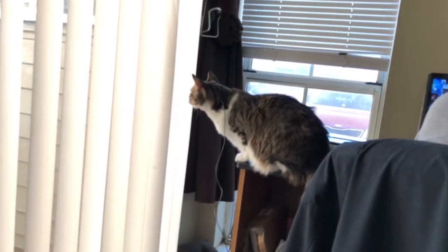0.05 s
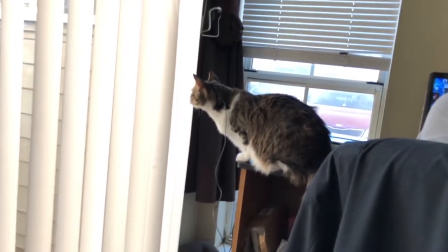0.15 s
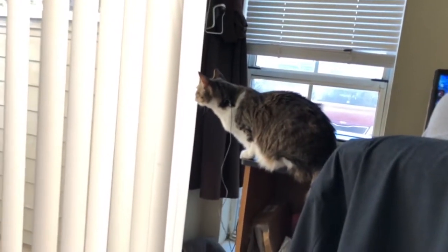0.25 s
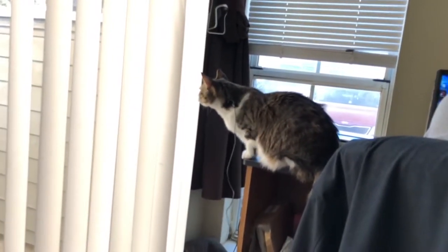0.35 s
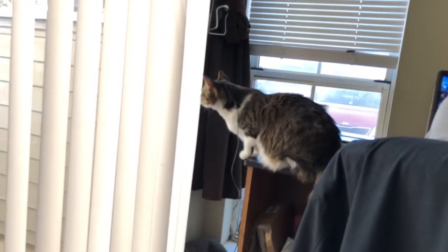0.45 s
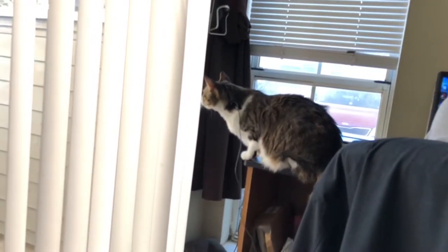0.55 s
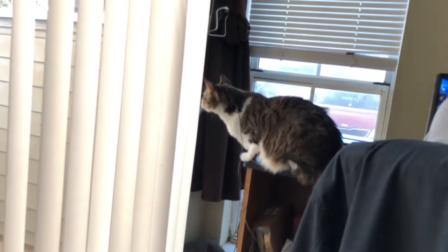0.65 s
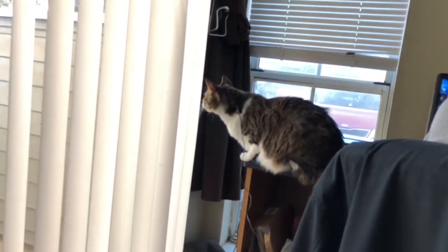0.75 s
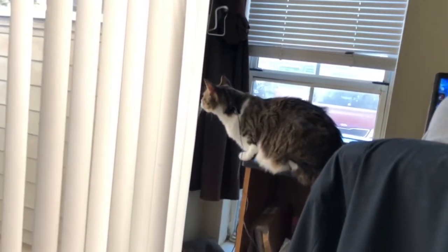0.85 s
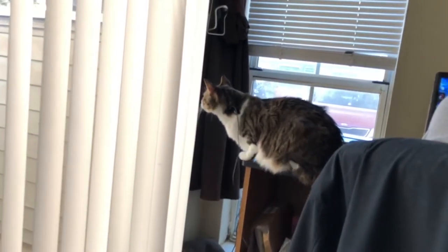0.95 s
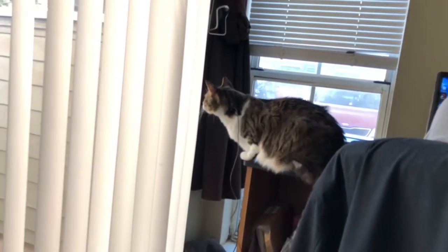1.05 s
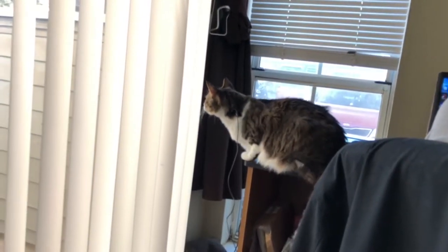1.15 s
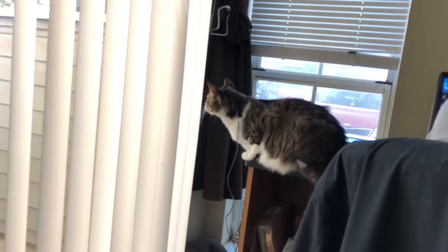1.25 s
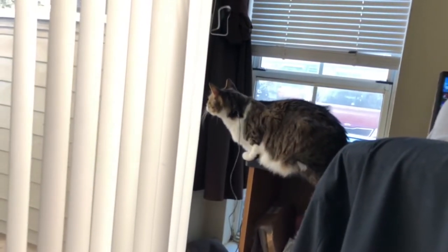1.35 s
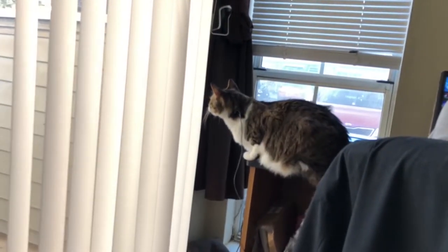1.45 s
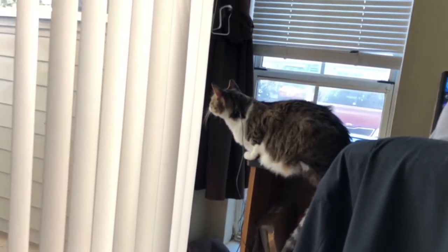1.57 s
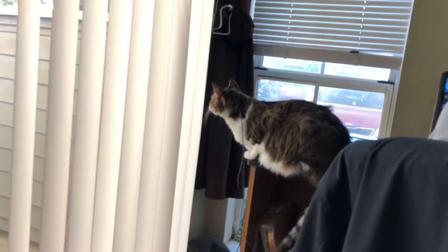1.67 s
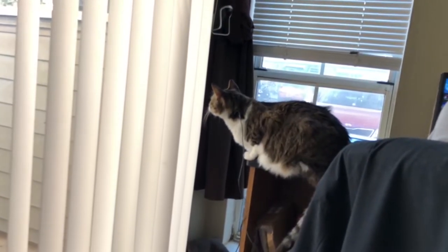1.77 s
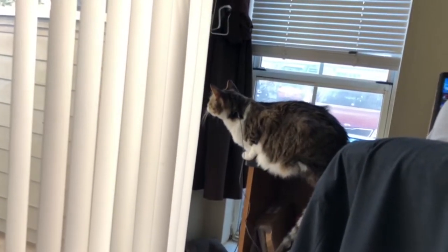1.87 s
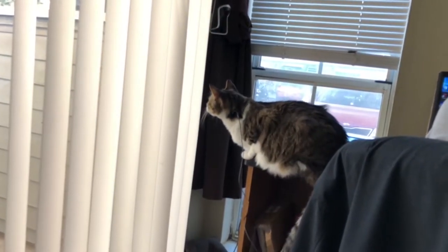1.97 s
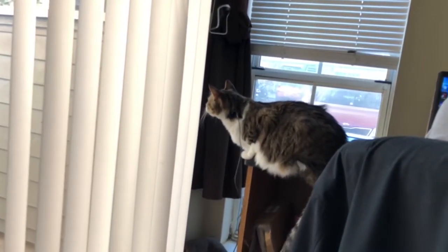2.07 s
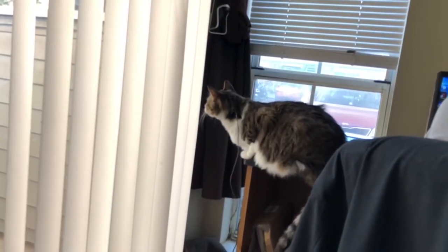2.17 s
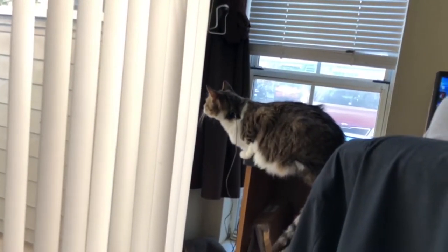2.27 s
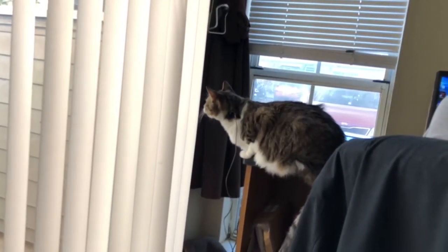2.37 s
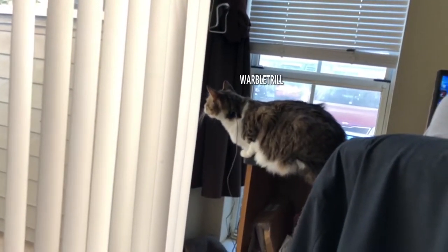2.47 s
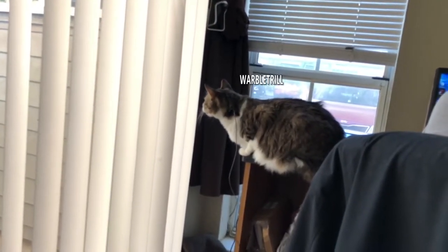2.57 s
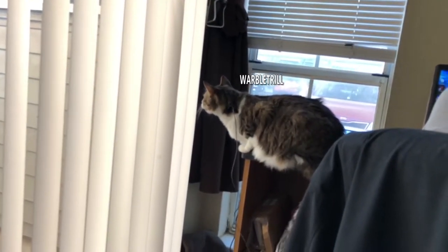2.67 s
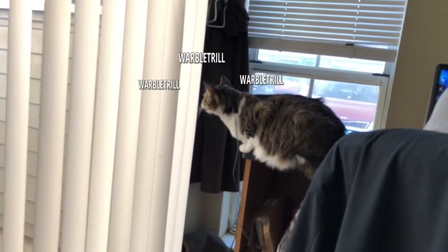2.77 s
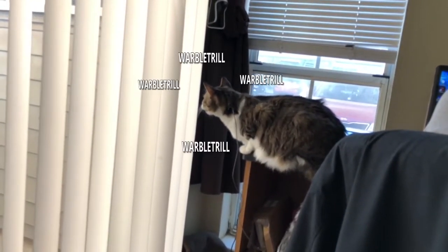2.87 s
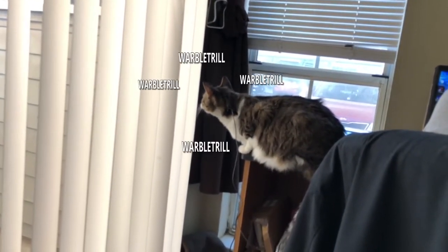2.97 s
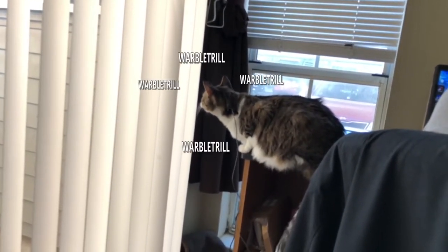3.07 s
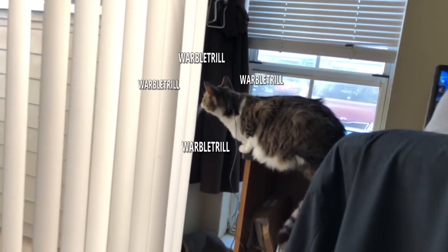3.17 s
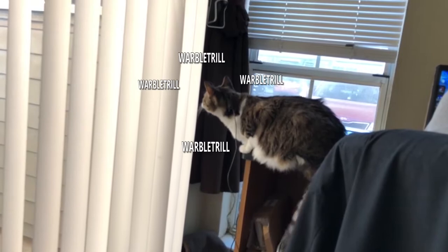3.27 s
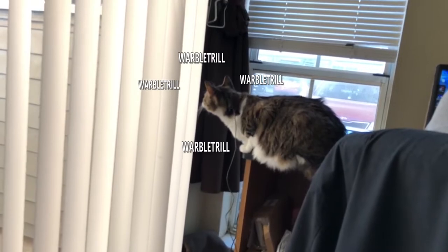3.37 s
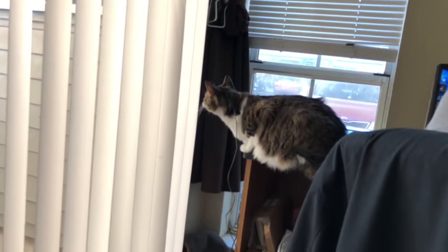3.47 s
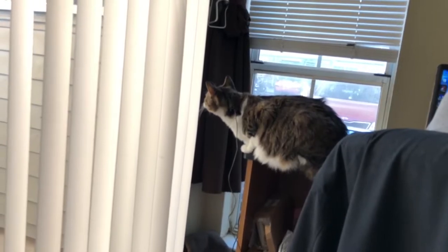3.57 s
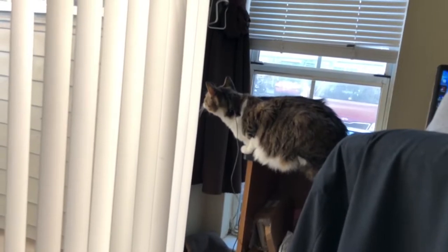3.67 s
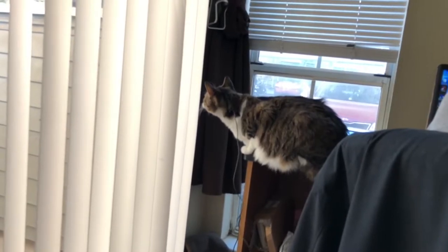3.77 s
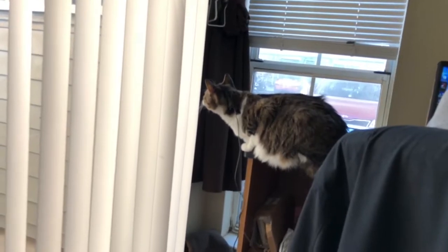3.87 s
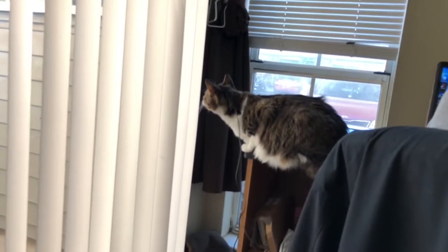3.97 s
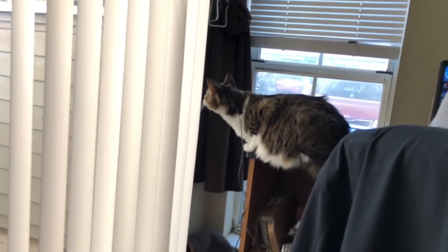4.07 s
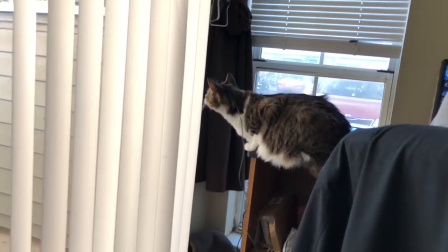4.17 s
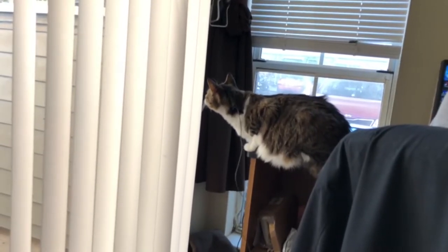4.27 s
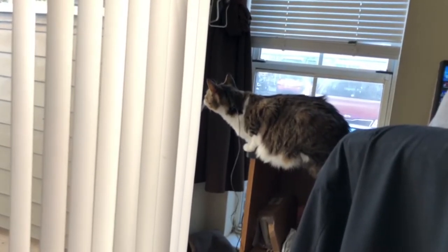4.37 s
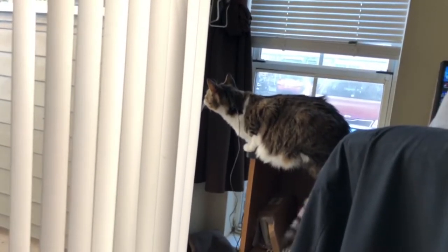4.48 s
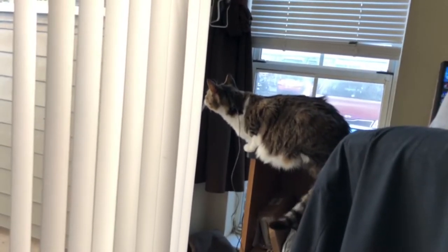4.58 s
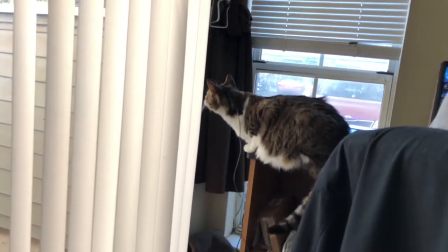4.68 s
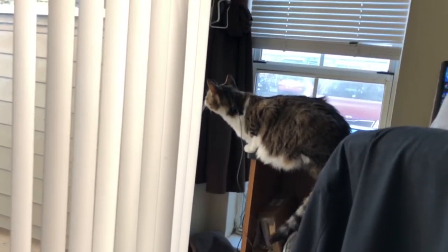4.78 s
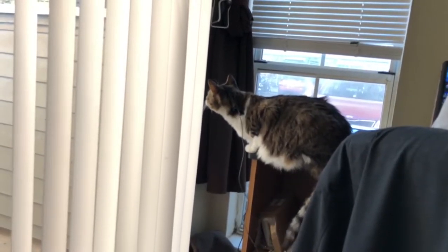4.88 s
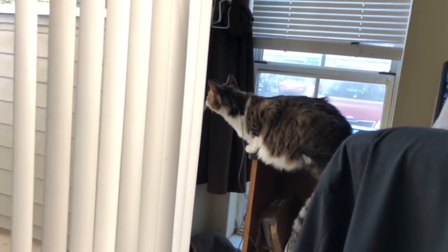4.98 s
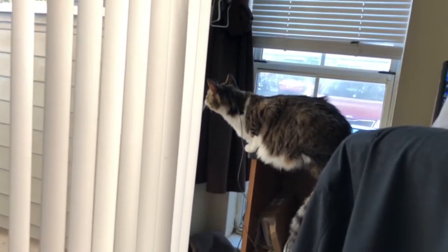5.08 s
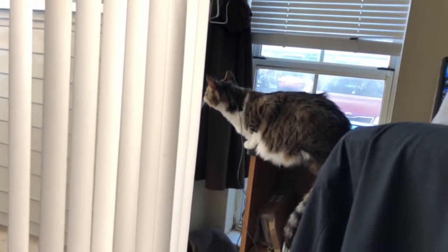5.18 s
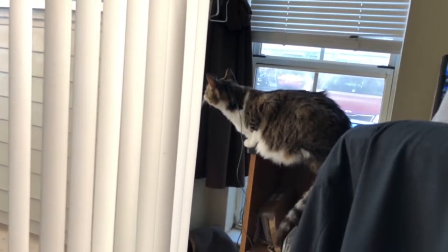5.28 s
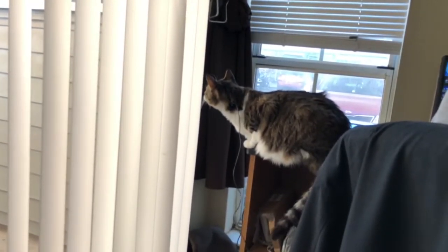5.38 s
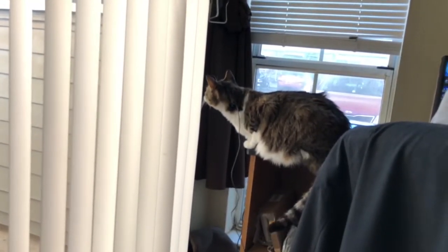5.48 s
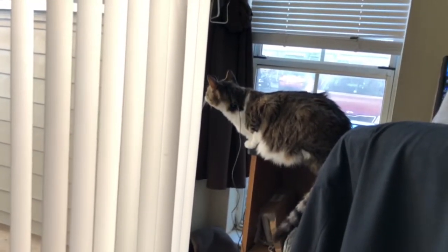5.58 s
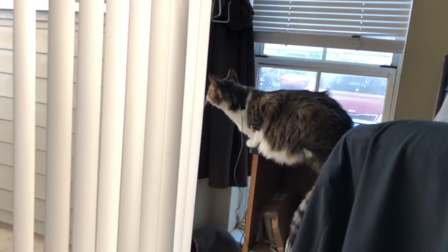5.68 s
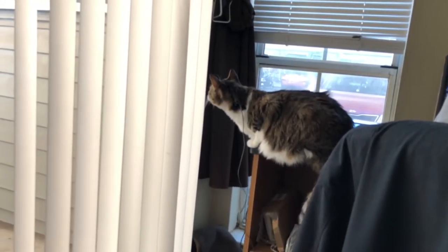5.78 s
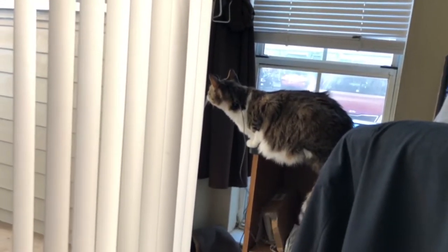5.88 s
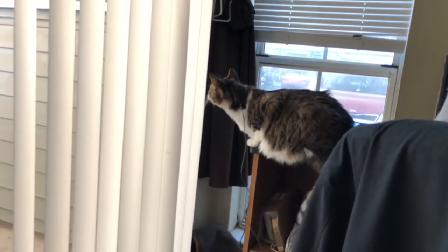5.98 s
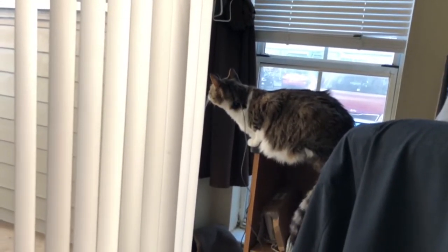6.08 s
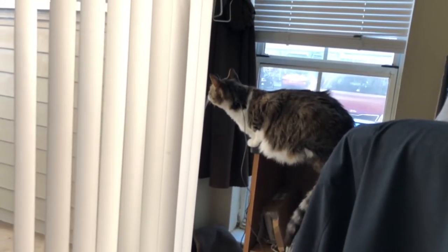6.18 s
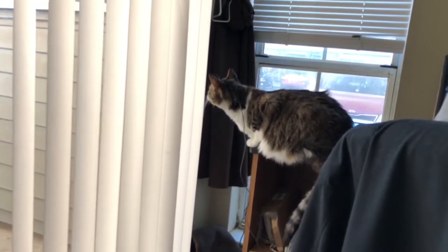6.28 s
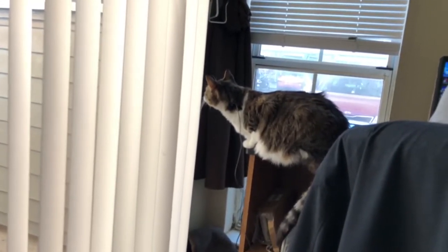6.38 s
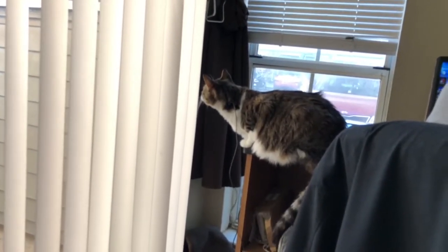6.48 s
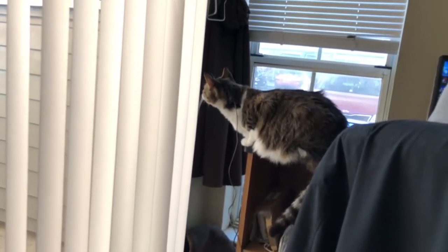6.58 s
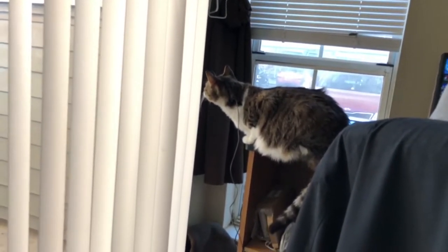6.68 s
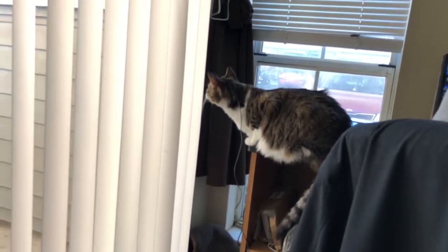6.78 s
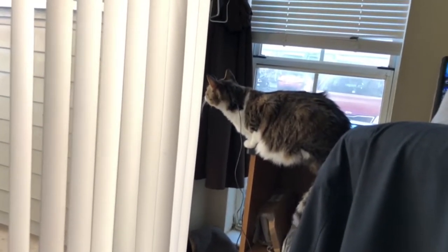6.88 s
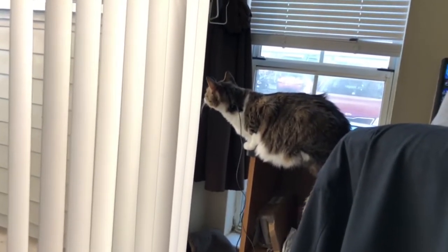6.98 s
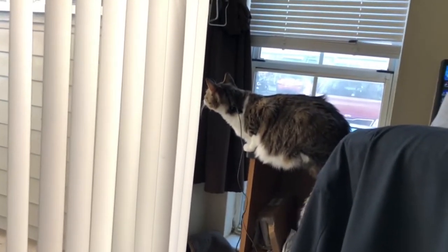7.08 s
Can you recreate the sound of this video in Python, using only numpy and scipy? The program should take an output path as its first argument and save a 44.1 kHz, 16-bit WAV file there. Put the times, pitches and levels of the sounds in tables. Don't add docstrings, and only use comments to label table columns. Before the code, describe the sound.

In a quiet, softly furnished room, a low fan hum, deep house rumble and soft duct air run steadily. Sparse dry ticks snap nearby. After about two and a half seconds a cat gives one short warbling chirp, rough at its start and edged with wet mouth clicks. A sharper tick follows, then later a little soft rustle and a faint metal tag tinkle. Heard through a phone microphone with softened top treble.

```python
import sys
import numpy as np
from scipy import signal
from scipy.fft import rfft, irfft, next_fast_len
from scipy.io import wavfile
from scipy.ndimage import uniform_filter1d

SR = 44100
rng = np.random.default_rng(int(sys.argv[2]) if len(sys.argv) > 2 else 0)


def volts(x):
    e = np.asarray(x, float) / 20
    return 10 ** e


def generate_wav(sig):
    pcm = np.round(np.clip(np.atleast_2d(sig).T, -1, 1) * 32767).astype(np.int16)
    wavfile.write(sys.argv[1], SR, pcm)


N = 314874


def evened(x):
    return x / np.sqrt(np.mean(x ** 2) + 1e-20)


def read(points, hz):
    f, value = np.transpose(points)
    return np.interp(np.log(hz + 0.12), np.log(f + 0.083), value)


def follow(table, t):
    s, *columns = np.transpose(table)
    return [uniform_filter1d(np.interp(t, s, c), size=300) for c in columns]


def add(mix, s, sound):
    part = mix[round(s * SR):][:len(sound)]
    part += sound[:len(part)]


def drift(rate_hz, size):
    padded = next_fast_len(size, True)
    hz = np.fft.rfftfreq(padded, 1 / SR)
    spectrum = rfft(rng.standard_normal(padded)) * np.exp(-(hz / rate_hz) ** 2) * (hz > 0)
    return evened(irfft(spectrum, padded)[:size])


def ring(x, hz, width):
    r = np.exp(-np.pi * width / SR)
    return signal.lfilter([1, 0, -1], [1, -2 * r * np.cos(2 * np.pi * hz / SR), r * r], x)


# multiple of shaft rate, level/dB rms, waver/dB
SHAFT = [(1, -30, 2.5), (2, -52.5, -4.5), (3, -62.5, 8), (5, -57.5, 2.5), (6, -60.5, 2.5), (10, -69.5, 2)]
# multiple of mains rate, level/dB rms, waver/dB
MAGNETIC = [(1, -43.5, 0.84), (2, -47.5, 2.35)]
SHAFT_HZ, MAINS_HZ = 29.63, 60.28


def motor():
    shaft = np.cumsum(SHAFT_HZ + 0.073 * drift(2.9, N)) / SR
    mains = MAINS_HZ * np.arange(N) / SR
    out = np.zeros(N)
    for turns, orders in ((shaft, SHAFT), (mains, MAGNETIC)):
        for k, db, waver_db in orders:
            level = volts(db + waver_db * drift(2.55, N))
            out += level * np.sqrt(2) * np.sin(2 * np.pi * (k * turns + rng.random()))
    return out


# f/Hz, level/dB per Hz
RUMBLE = [(1, -37), (4, -39.5), (10, -46), (18, -46), (25, -56.5), (40, -67.5), (60, -54.5), (80, -68.5),
          (115, -65), (135, -74), (175, -74.5), (210, -82), (300, -105)]


def rumble():
    hz = np.fft.rfftfreq(N, 1 / SR)
    shape = volts(read(RUMBLE, hz)) * np.sqrt(SR / 2) * (hz < 400)
    return irfft(rfft(rng.standard_normal(N)) * shape, N)


# f/Hz, level/dB per Hz
AIR = [(120, -28), (200, 0), (300, -8.5), (390, -11), (800, -11.5), (980, -12), (1200, -12), (1600, -18.5),
       (2750, -23.5), (3500, -29.5), (4400, -32), (10300, -38.5), (11800, -43), (16000, -42.5)]
# f/Hz, width/Hz, level/dB rms
DUCT = [(256, 9.6, -68.5), (604.4, 9, -68), (801, 27, -67.5), (1156, 40, -70.5), (2702, 24, -79.5)]
AIR_DB = -55.5
GUST_DB, SETTLE_S = 1, 2.2


def air():
    frames, hz = N // 256 + 5, np.fft.rfftfreq(1024, 1 / SR)
    a, b, patches = rng.standard_normal((frames, 513, 3)).T
    patches = uniform_filter1d(patches, size=14, axis=0)
    patches = evened(uniform_filter1d(patches, size=12, axis=1))
    at = np.arange(frames) * 256
    swell = drift(3.6, N)[np.minimum(at, N - 1)]
    gust_db = np.outer(np.clip(hz / 2000, 0, 1), GUST_DB * np.exp(-(at / SR / SETTLE_S) ** 2))
    z = (a + 1j * b) * volts(read(AIR, hz)[:, None] + patches + 0.18 * swell + gust_db)
    out = volts(AIR_DB) * evened(signal.istft(z, nperseg=1024, noverlap=768)[1][:N])
    for f, width, db in DUCT:
        out += volts(db) * evened(ring(rng.standard_normal(N), f, width))
    return out


# t/s, peak level/dB, low part level/dB
TICKS = [(0.156, -52, -8), (0.5495, -57, -6), (0.6039, -58, -6), (0.8045, -56, -4), (1.1175, -55, -6),
         (1.21, -52, -2), (1.2139, -56, -4), (1.2238, -50, 4), (1.8286, -52, -6), (3.2594, -55, -6),
         (3.277, -37, 4), (3.689, -56, -6), (3.7657, -55, -6), (4.0089, -48, 6), (5.428, -53, -6),
         (6.5639, -54, -2)]
# t/s, peak level/dB
THIN_TICKS = [
    (1.928, -49),
    (2.1759, -58),
    (2.802, -64),
    (2.9271, -52.5),
    (2.9815, -55),
    (3.109, -53),
]
TICK_HZ, THIN_HZ, THIN_LOW_DB = 10000, 12300, -14.5


def ticks():
    out, click = np.zeros(N), np.zeros(400)
    click[0] = 1
    events = [(*row, TICK_HZ) for row in TICKS]
    events += [(*row, THIN_LOW_DB, THIN_HZ) for row in THIN_TICKS]
    for s, db, low_db, hz in events:
        high = ring(ring(click, hz, 2800), 0.96 * hz, 7000)
        low = ring(click, 0.74 * hz, 1500) + ring(click, 0.42 * hz, 1500)
        snap = high / abs(high).max() + volts(low_db) * low / abs(low).max()
        add(out, s + 0.0017, volts(db) * snap)
    return out


def room(x):
    at = np.arange(150, 9000, 22)
    at = at + rng.integers(0, 22, len(at))
    taps = np.zeros(9100)
    taps[at] = rng.choice([-1., 1.], len(at)) * volts(-60 * at / SR / 0.28)
    return signal.oaconvolve(x, taps / np.linalg.norm(taps))[:N]


# t/s, peak level/dB, centre f/Hz, width/Hz, tail/s
SMACKS = [(2.4017, -61, 7200, 2500, .003), (2.405, -59, 7500, 9000, .3), (2.416, -43, 2300, 2200, 0.004),
          (2.433, -58, 8500, 4000, .03), (2.4618, -45, 5200, 1520, .004), (2.8, -62, 7970, 8960, 0.33),
          (2.459, -32.5, 4640, 2980, 0.0033), (2.4595, -55, 11000, 9000, .006),
          (2.4640, -48, 5560, 900, 0.026), (2.4640, -50, 7600, 1200, 0.027),
          (2.9625, -56, 3000, 1500, .004), (4.8713, -53, 4200, 3000, 0.01), (4.8752, -49, 3500, 2000, .009),
          (4.883, -57, 3500, 2000, 0.025), (4.9562, -49, 3000, 3000, 0.0065),
          (4.9618, -52, 3700, 1300, 0.017), (5.003, -47, 1800, 2200, 0.008), (5.006, -59, 5800, 1500, .015),
          (0.45, -62, 7950, 8000, .05), (.44, -57, 2200, 4000, 0.25)]


def smacks():
    out, t = np.zeros(N), np.arange(6000) / SR
    for s, db, hz, width, tail in SMACKS:
        burst = ((t == 0) + 0.81 * rng.standard_normal(len(t))) * volts(-60 * t / tail)
        snap = ring(ring(burst, hz, width), hz, width)
        add(out, s, volts(db) * snap / abs(snap).max())
    return out


# t/s, f/Hz
PITCH = [(2.428, 651), (2.445, 584), (2.47, 577), (2.479, 529), (2.56, 514.7), (2.625, 572), (2.918, 583),
         (2.941, 500), (2.98, 625)]
# t/s, pitch dip/Hz, half length/s
WARBLE = [
    (2.443, 25, 0.0041),
    (2.458, 14.5, 0.0062),
    (2.564, -47.5, 0.011),
    (2.648, 28, 0.012),
    (2.688, 10.5, 0.019),
    (2.735, 26, 0.013),
    (2.774, -7.5, 0.024),
    (2.797, 22, .014),
    (2.865, 12.5, 0.032),
]


def fold_pitch(t):
    hz, = follow(PITCH, t)
    for at, dip, half in WARBLE:
        hz = hz - dip * np.exp(-((t - at) / half) ** 2)
    return hz


# start t/s, end t/s, depth level/dB, hoarseness level/dB
DOUBLING = [
    (2.437, 2.49, -36, -24),
    (2.483, 2.508, -19, -20),
    (2.502, 2.532, -4, -16.5),
    (2.533, 2.542, -24, -22),
    (2.552, 2.572, -5.5, -16),
    (2.604, 2.637, -24, -26),
    (2.641, 2.678, -13.5, -22),
    (2.925, 2.953, -26, -25),
    (2.958, 2.987, -19, -17.5),
]


def alternation(t):
    doubled, hoarse = np.zeros(len(t)), np.full(len(t), volts(-31))
    for start, end, depth_db, hoarse_db in DOUBLING:
        gate = uniform_filter1d(1. * (abs(t - (start + end) / 2) < (end - start) / 2), size=250)
        doubled += volts(depth_db) * gate
        hoarse += volts(hoarse_db) * gate
    return doubled, hoarse


# f/Hz, level/dB
HEAD = [(250, -16), (550, 0), (800, 2), (1100, -4), (1350, -14), (1600, -23), (2200, -21), (2800, -29),
        (3450, -31), (4000, -35), (4500, -50), (5200, -54), (5750, -41), (6300, -56)]
# t/s, throat f/Hz, mouth f/Hz
JAW = [(2.455, 1830, 2350), (2.472, 2120, 3750), (2.58, 1910, 3800), (2.61, 1690, 3800),
       (2.705, 1730, 3450), (2.722, 1940, 3450), (2.916, 2180, 3400), (2.94, 2130, 2600),
       (2.975, 2420, 2940)]
START_S, END_S = 2.422, 2.992
CLOSING_S, CLOSE_S, OPEN_S, SHUT_DB = 2.945, 0.028, 0.012, -6
LIFT_DB, LIFT_START_DB, LIFT_END_DB, LIFT_POWER = 15.5, 9, 15, 1.3
NASAL_HZ, NASAL_WIDTH_HZ, NASAL_DB, NASAL_SHUT_S = 2700, 180, -7, (2.6, 2.72)


def vocal_tract(t):
    throat_hz, mouth_hz = follow(JAW, t)
    since = t - START_S
    closing = np.clip((t - CLOSING_S) / CLOSE_S, 0, 1)
    lift_db = LIFT_START_DB + (LIFT_DB - LIFT_START_DB) * np.sin(np.pi * since / (END_S - START_S)) ** LIFT_POWER
    lift_db = lift_db + (LIFT_END_DB - lift_db) * closing
    nasal_db = np.interp(t, NASAL_SHUT_S, (NASAL_DB, 0))
    tilt_db = SHUT_DB * np.maximum(closing, 1 - since / OPEN_S)

    def colour(f):
        throat_db = lift_db / (1 + ((f - throat_hz) / 160) ** 2)
        mouth_db = 7.6 / (1 + ((f - mouth_hz) / 250) ** 2)
        hollow_db = nasal_db / (1 + ((f - NASAL_HZ) / NASAL_WIDTH_HZ) ** 2)
        lips_db = tilt_db * np.log2(np.where(f < 4800, f, 1100) / 560)
        return volts(read(HEAD, f) + lips_db + throat_db + mouth_db + hollow_db)

    return colour


# t/s, level/dB
EFFORT = [(2.432, -38.5), (2.445, -39), (2.47, -37.5), (2.6, -39.5), (2.71, -37.5), (2.93, -34),
          (2.974, -37)]
ATTACK_DB_PER_S, RELEASE_DB_PER_S = 1800, 999
YIELD_DB = -7.5


def chirp():
    t = np.arange(START_S, END_S, 1 / SR)
    effort_db, = follow(EFFORT, t)
    effort_db = effort_db - ATTACK_DB_PER_S * np.maximum(EFFORT[0][0] - t, 0)
    effort_db = effort_db - RELEASE_DB_PER_S * np.maximum(t - EFFORT[-1][0], 0)
    hz, colour = fold_pitch(t), vocal_tract(t)
    doubled, hoarse = alternation(t)
    jitter = (.002 + .035 * hoarse) * drift(150, len(t))
    turns = np.cumsum(hz * (1 + jitter)) / SR
    voice = np.zeros(len(t))
    for k in range(1, 23):
        shimmer = volts((-0.13 + 0.075 * k + 1.6 * k * hoarse) * drift(67, len(t)))
        hz_k, phase = hz * k / 2, np.pi * k * turns + 0.78 * k
        octaves = np.log2(hz_k / 800)
        if k % 2:
            share = doubled * volts(2.9 * octaves)
        else:
            share = volts(YIELD_DB * doubled * (k > 2))
        rasp = drift(230, len(t)) * np.cos(phase) + drift(230, len(t)) * np.sin(phase)
        tone = share * shimmer * np.sqrt(2) * np.cos(phase)
        voice += colour(hz_k) * (tone + hoarse * volts(1.0 + 4.8 * octaves) * rasp)
    out = np.zeros(N)
    add(out, START_S, volts(effort_db) * voice * signal.windows.tukey(len(t), .02))
    return out


# t/s, level/dB
TINKLES = [
    (4.991, -49),
    (5.0, -52),
    (5.003, -51),
    (5.011, -54),
]
TAG_HZ, TAG_T60 = 4420, 0.025


def tinkles():
    out, t = np.zeros(N), np.arange(6000) / SR
    mode = np.sin(2 * np.pi * TAG_HZ * (t + 1.1 * t ** 2)) * np.minimum(t / 0.0028, 1)
    for s, db in TINKLES:
        add(out, s, volts(db - 60 * t / TAG_T60) * mode)
    return out


def scene():
    cat, small = chirp(), ticks() + smacks() + tinkles()
    reflected = room(volts(-23) * cat + volts(-22) * small)
    return (cat + small + reflected + motor() + rumble() + air())[None]


def band_limit(x):
    return signal.sosfilt(signal.butter(12, 16180, fs=SR, output="sos"), x)


def record(dry):
    edge = signal.firwin(511, 15780, window=("kaiser", 9), fs=SR)
    padded = np.pad(dry, ((0, 0), (255, 255)), "edge")
    limited = signal.oaconvolve(padded, edge[None], "valid", axes=1)
    return band_limit(limited)


dry = scene()
out = record(dry)
generate_wav(out)
```